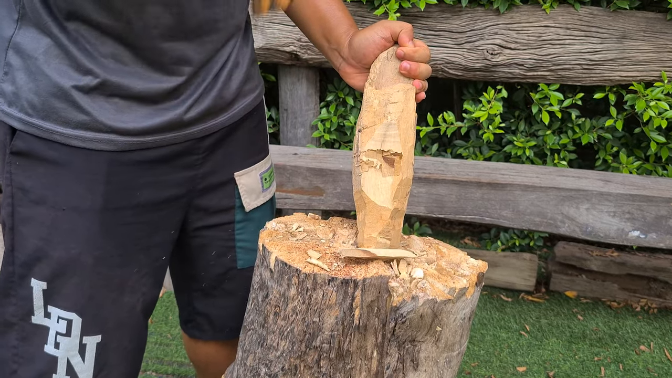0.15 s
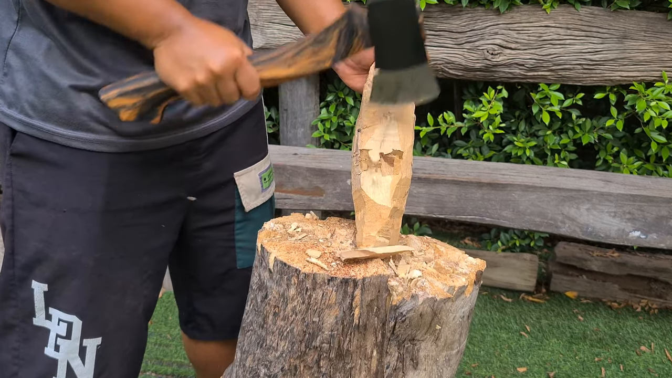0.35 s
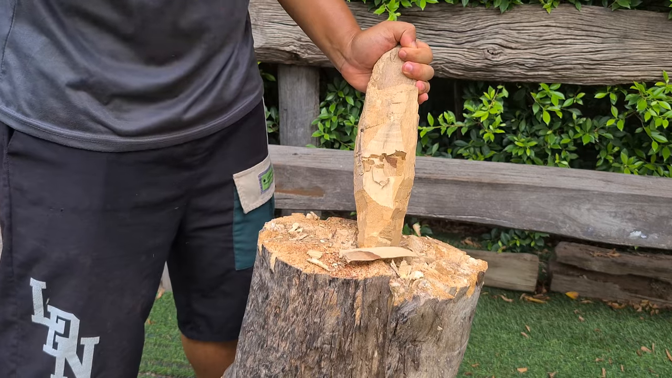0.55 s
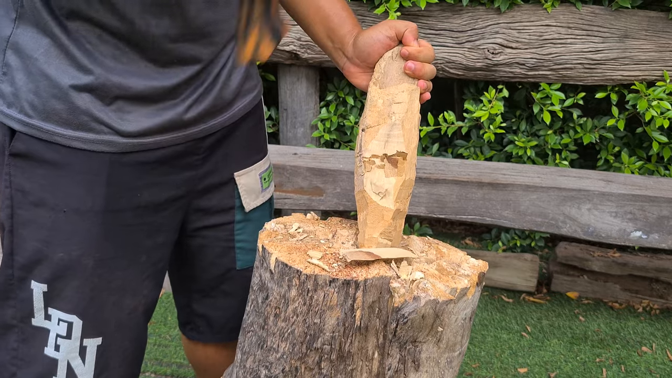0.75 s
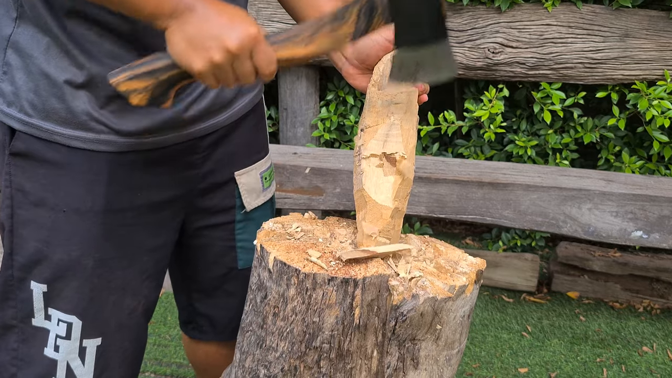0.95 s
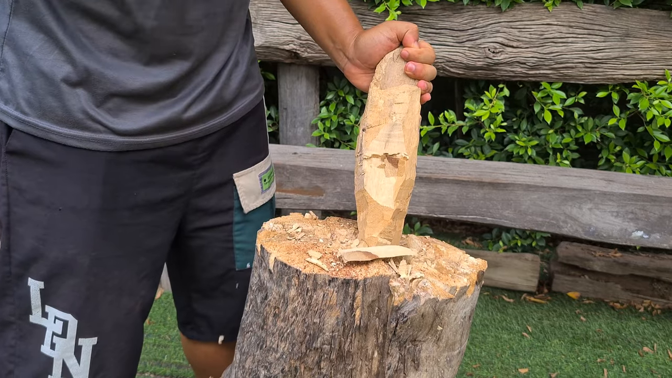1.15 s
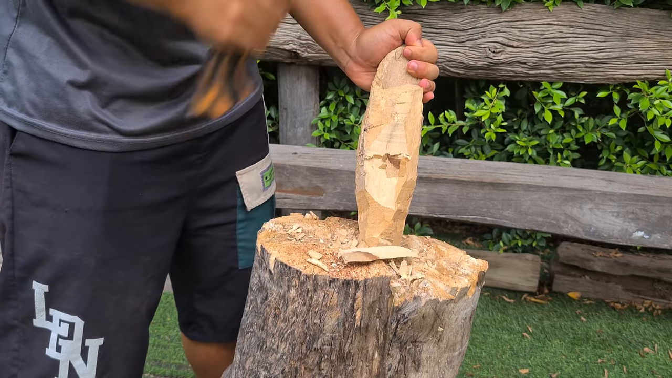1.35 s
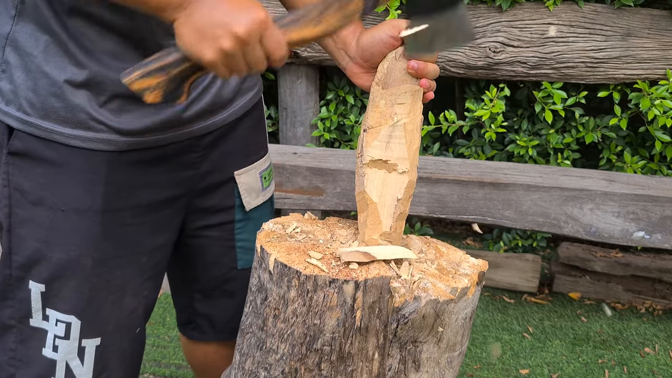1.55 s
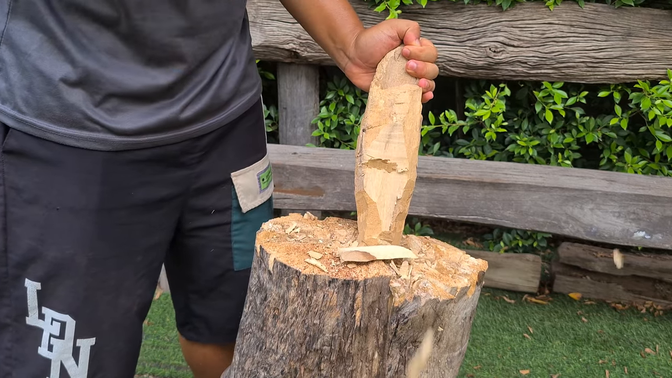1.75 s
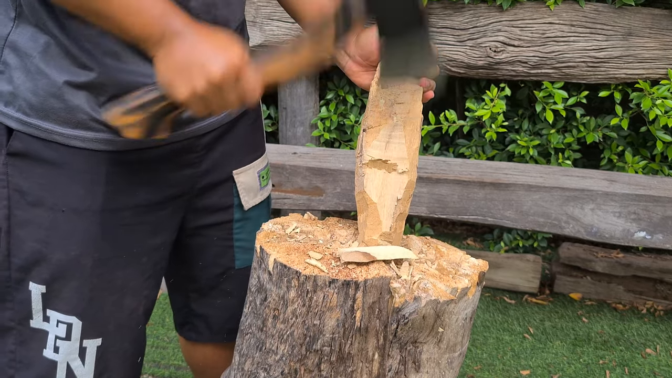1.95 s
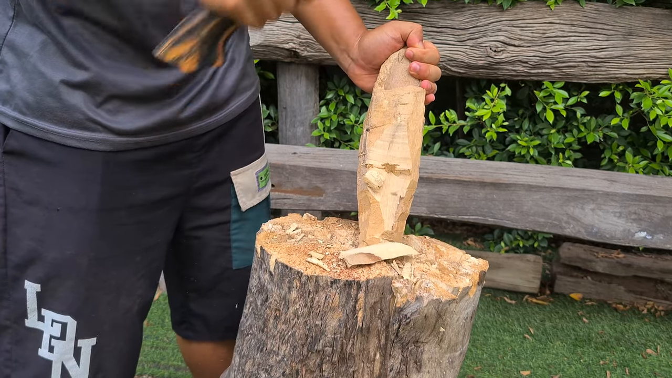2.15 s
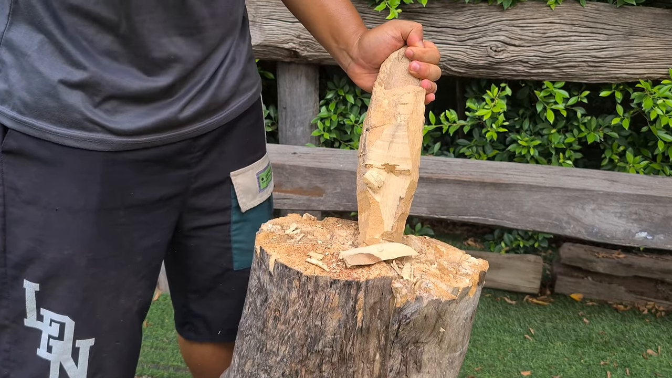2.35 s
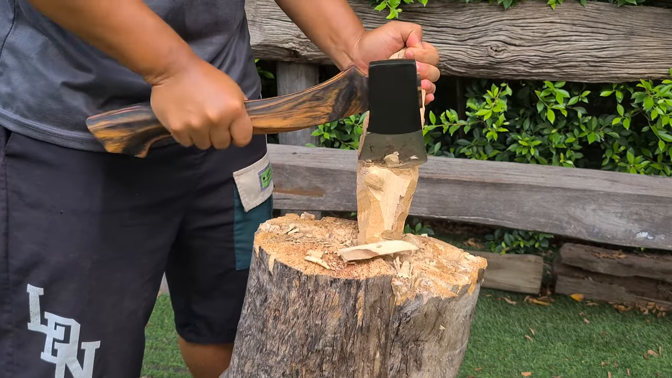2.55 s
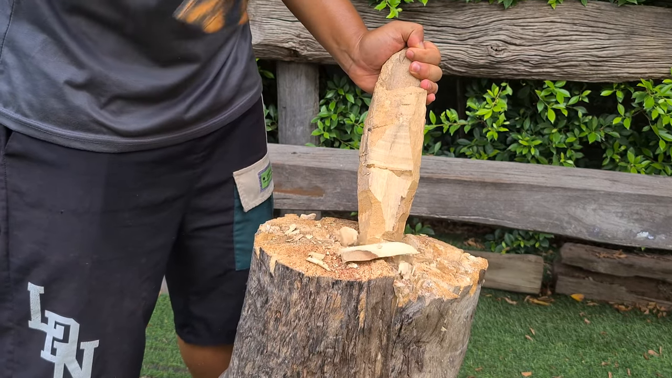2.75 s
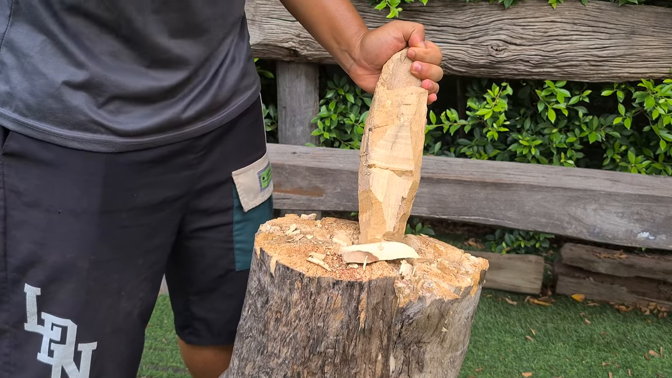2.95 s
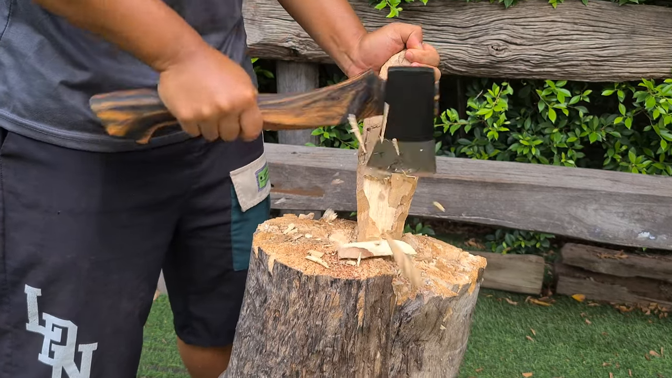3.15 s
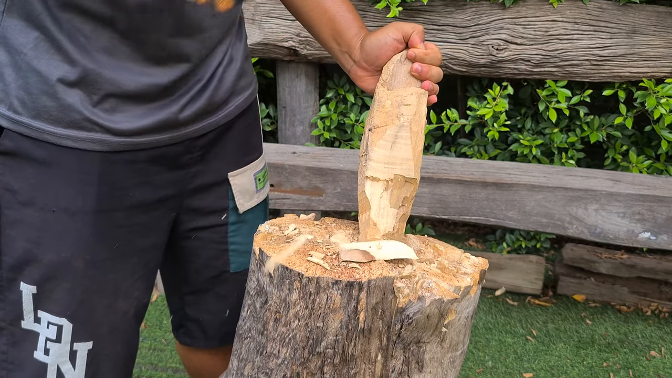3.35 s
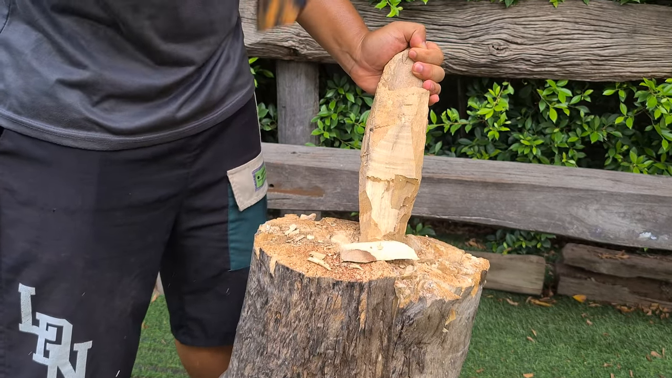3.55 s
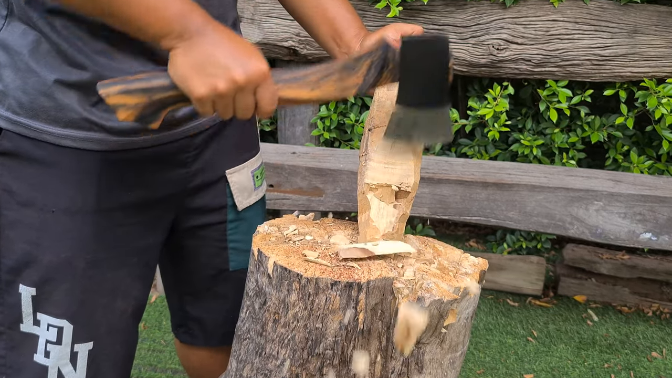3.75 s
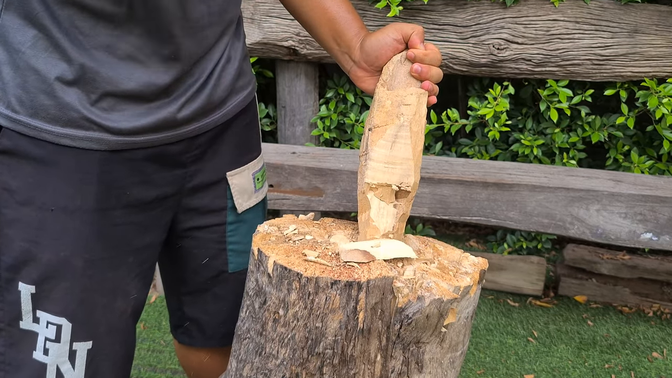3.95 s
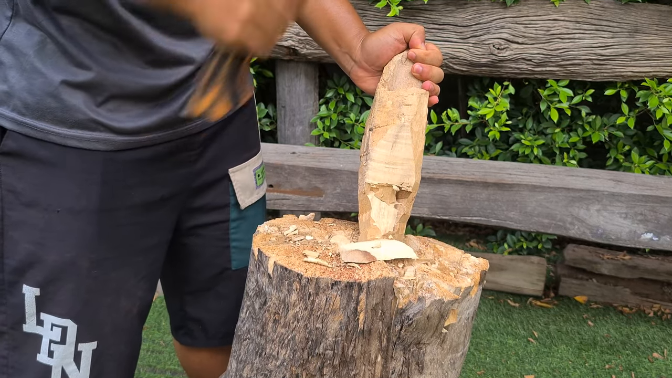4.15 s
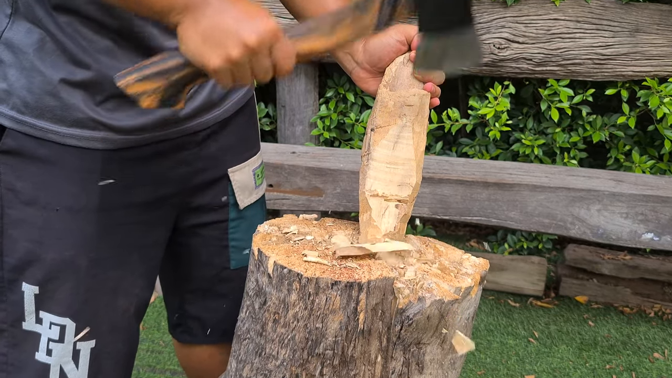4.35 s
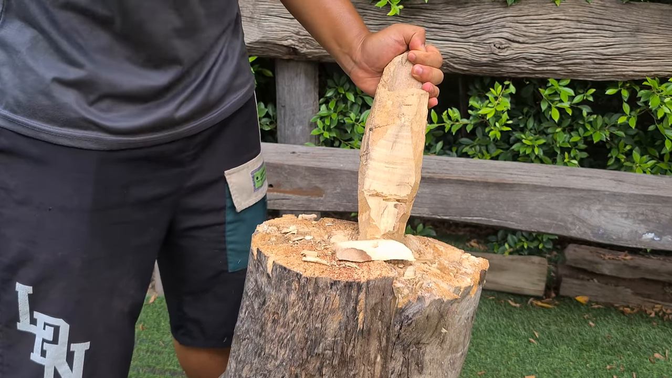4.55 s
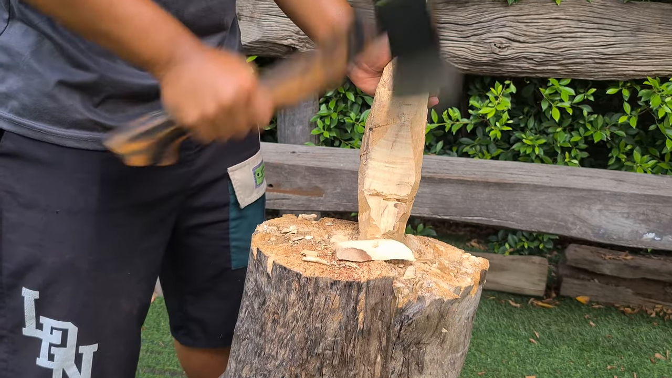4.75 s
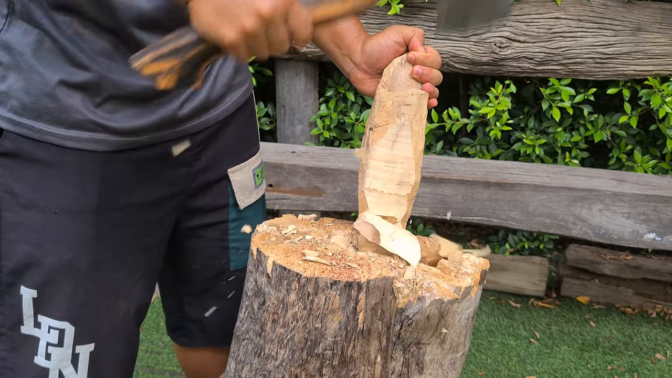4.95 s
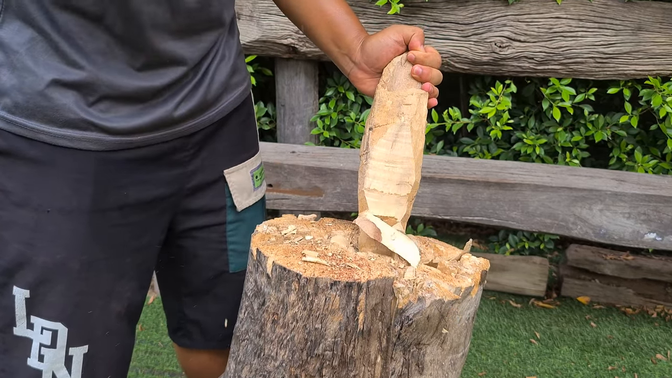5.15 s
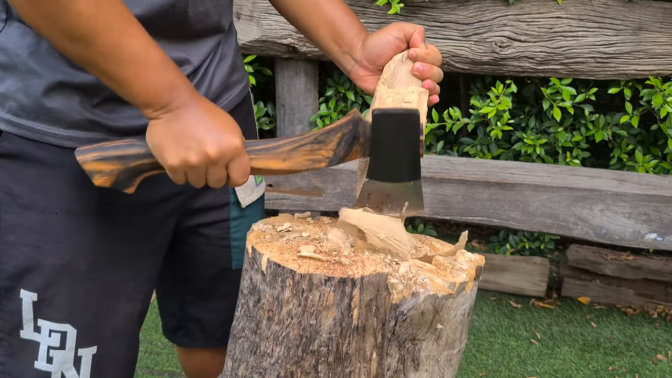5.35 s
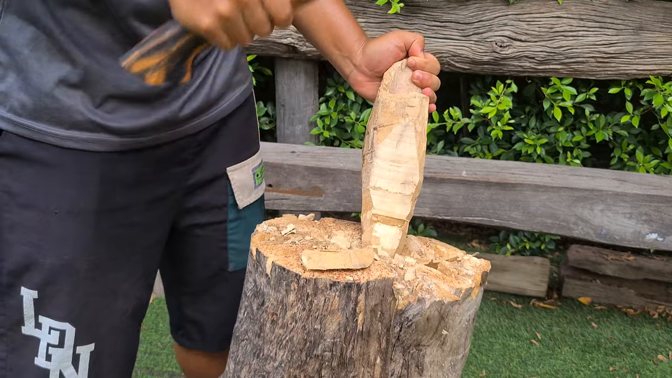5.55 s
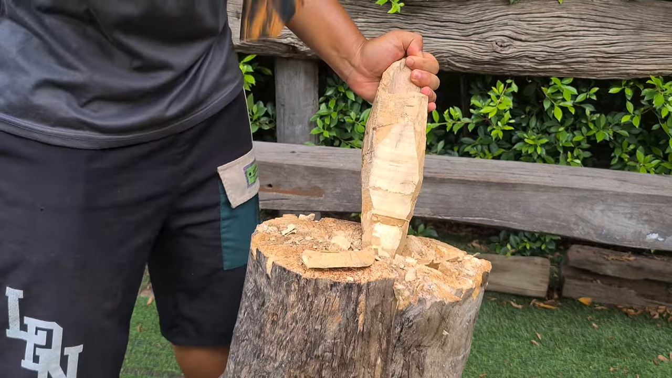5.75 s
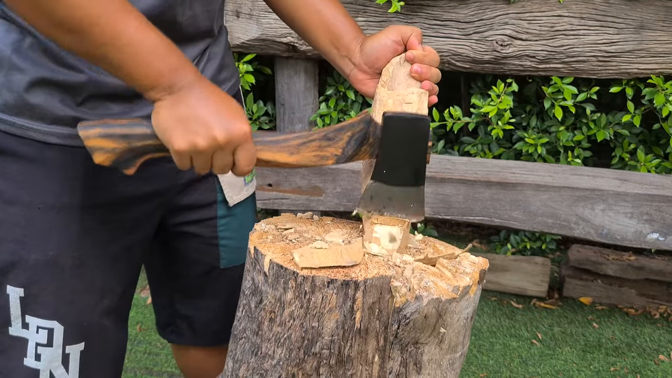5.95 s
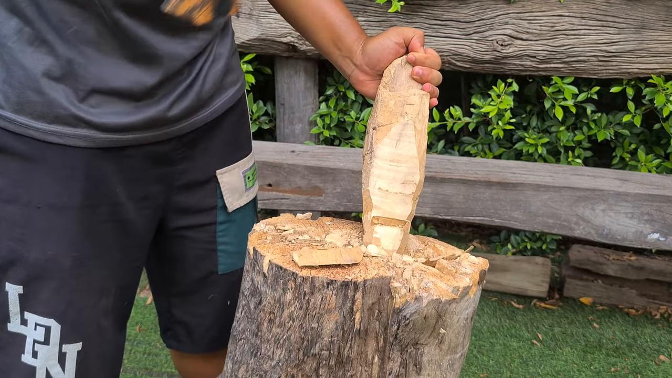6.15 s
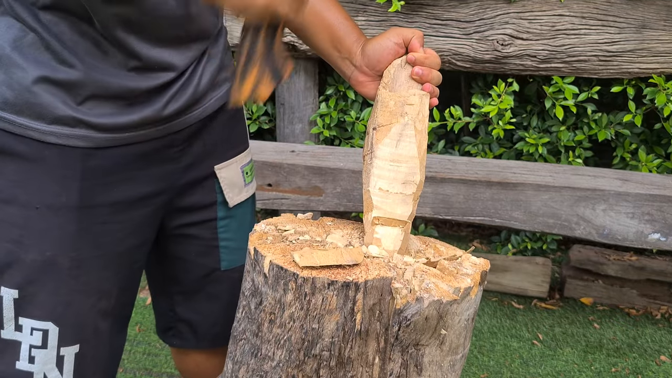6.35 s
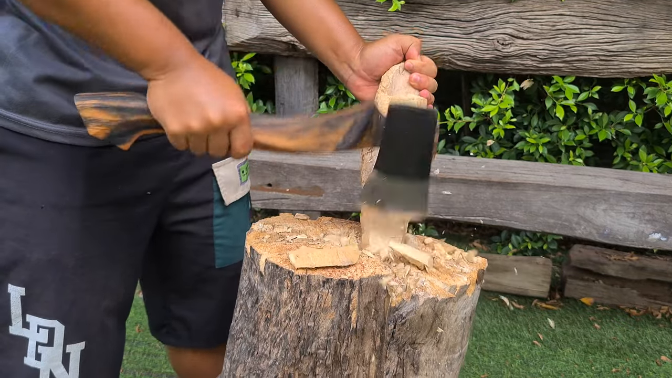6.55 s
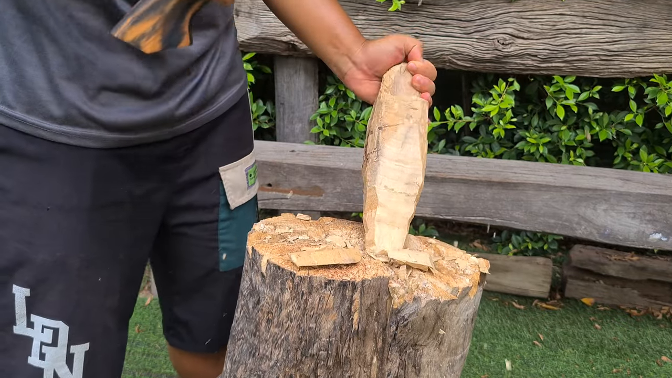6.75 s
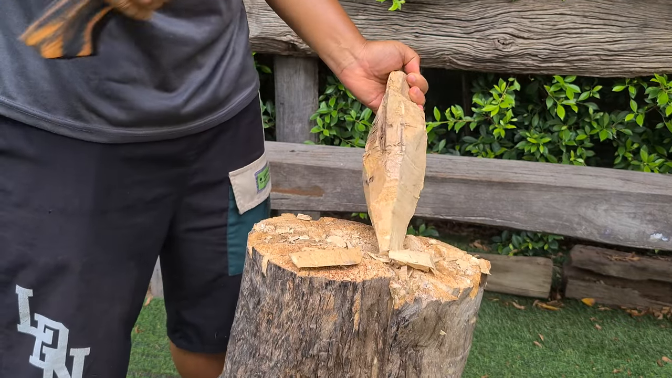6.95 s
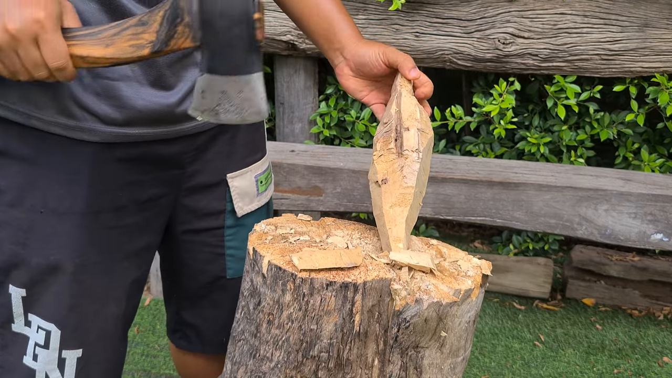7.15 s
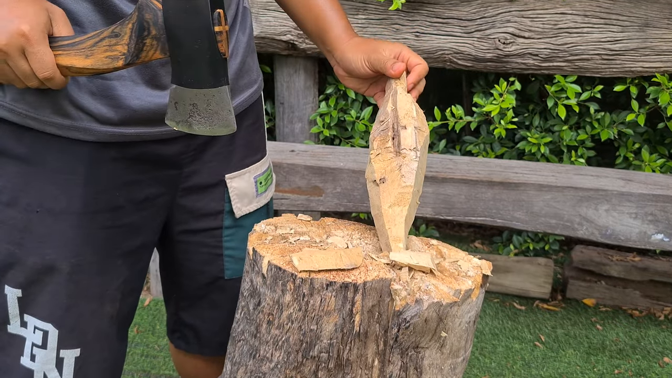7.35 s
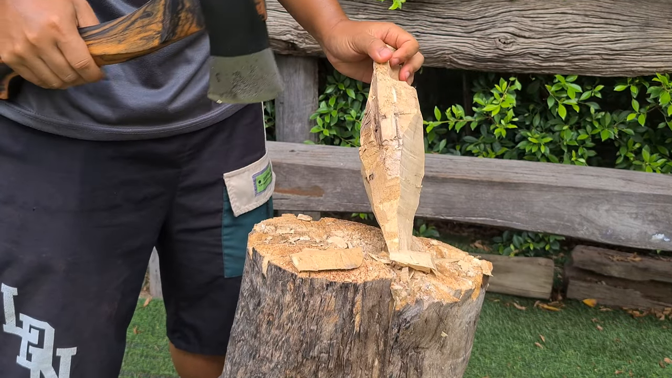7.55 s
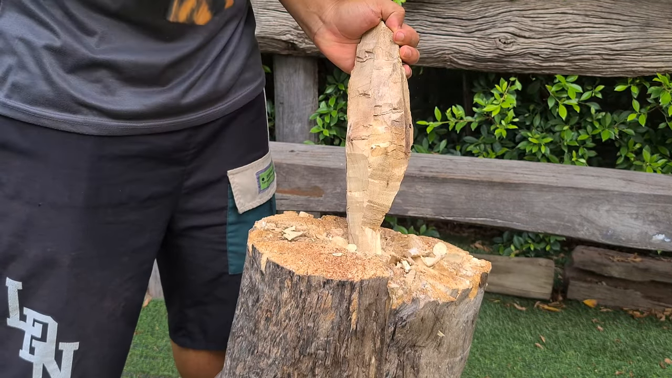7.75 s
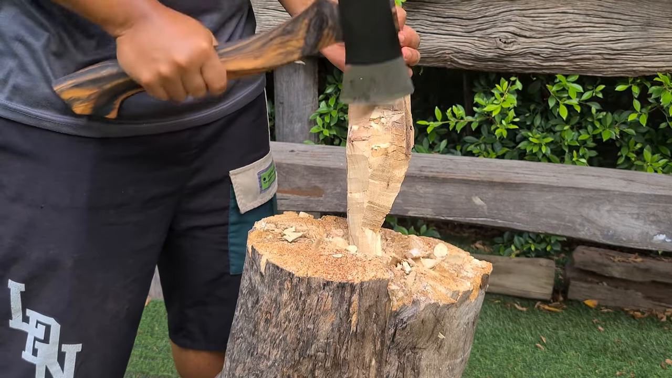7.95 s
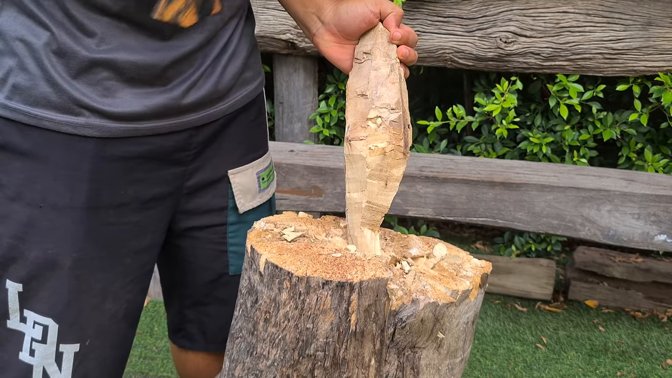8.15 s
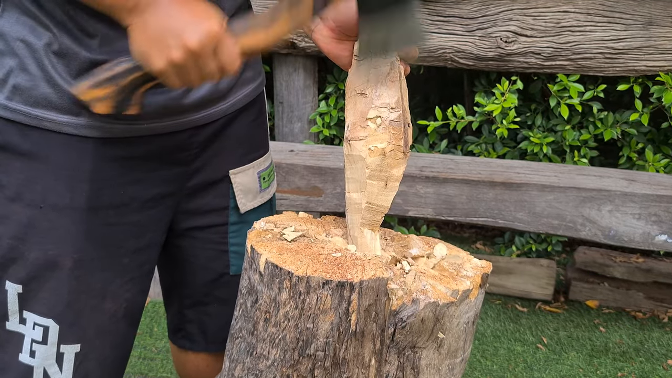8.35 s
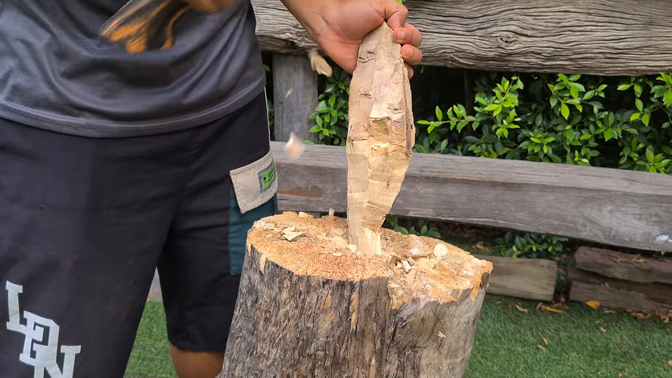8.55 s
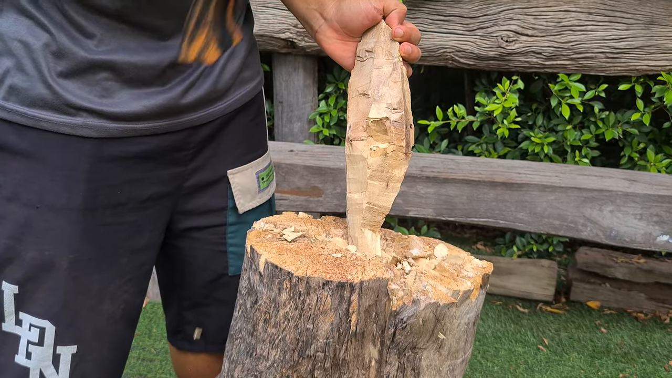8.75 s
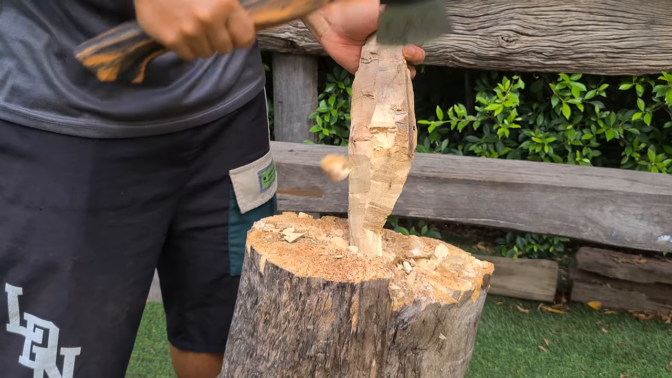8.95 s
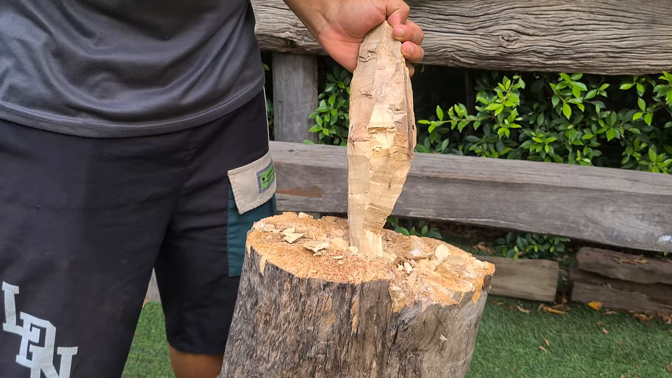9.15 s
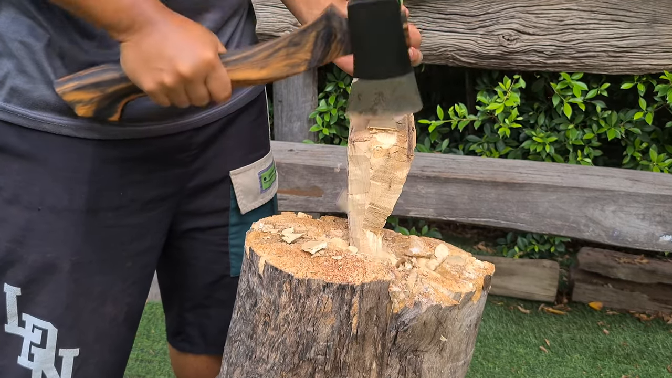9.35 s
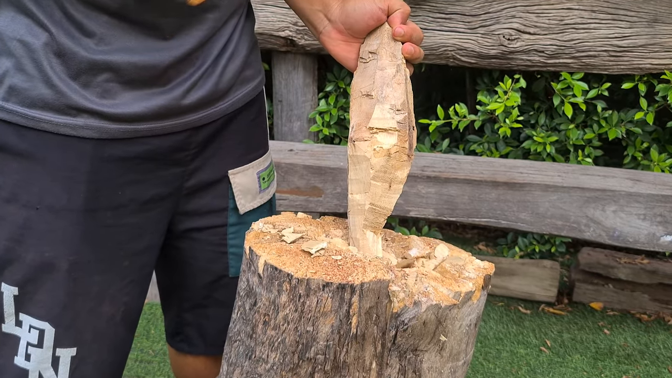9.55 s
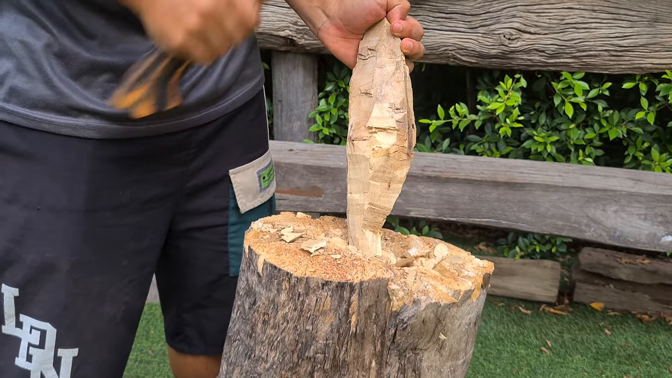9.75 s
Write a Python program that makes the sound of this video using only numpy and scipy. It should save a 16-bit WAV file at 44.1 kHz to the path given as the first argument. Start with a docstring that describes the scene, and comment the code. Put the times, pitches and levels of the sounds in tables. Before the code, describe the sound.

Close to the microphone in a fenced yard, a hatchet strikes a wooden block on a stump about every half second, each blow a sharp clack with tearing fibres, a low thud and a short outdoor echo. Small chips tick and tap down between blows. After a pause with faint hand rubbing, lighter, slightly quicker chops follow over a distant machine's low hum and pulsing hiss.

```python
"""In a fenced yard, a hatchet hews a hand-held billet on a chopping stump, close to the microphone.
Each blow is a mix of ringing wood, tearing noise and a thud from the stump; echoes of the yard follow it.
Chips tap and ping as they land, and the hand rubs the wood. After a cut to a later moment come lighter,
quicker blows, over the pulsing noise hiss, rumble and hum of a distant machine, heard from that cut on.
Behind them lie a faint whining tone, and shaped noise for distant traffic, moving air and leaves."""
import sys
import numpy as np
from scipy import signal
from scipy.fft import rfft, irfft, next_fast_len
from scipy.io import wavfile
from scipy.ndimage import map_coordinates

SR = 44100
rng = np.random.default_rng(int(sys.argv[2]) if len(sys.argv) > 2 else 0)


def dump_mix(stems):
    """Bounce the given channels to the path in sys.argv[1] as a 16-bit WAV at rate SR."""
    frames = np.atleast_2d(stems).T  # one column per channel
    limited = np.clip(frames, -1, 1)  # hard clip at full scale
    pcm = np.round(limited * 32767).astype(np.int16)
    wavfile.write(sys.argv[1], SR, pcm)


N = 436590


def amp(db):
    """Turn decibels into gain."""
    return 10 ** (np.asarray(db) / 20)


def unit(x):
    """Scale to rms 1."""
    return x / np.sqrt(np.mean(x ** 2) + 1e-20)


def burst(x):
    """Scale a short sound to the energy of 10 ms at rms 1."""
    return x / np.sqrt(np.sum(x ** 2) / (SR / 100) + 1e-20)


def along(points, hz):
    """Read a curve of (frequency, value) points, drawn straight on a log frequency axis."""
    point_hz, value = np.transpose(points)
    return np.interp(np.log(hz + 1), np.log(point_hz), value)


def filtered(x, response):
    """Multiply the spectrum of x by a response that depends on frequency."""
    n = x.shape[-1]
    padded = next_fast_len(n + 4096)
    spectrum = rfft(x, padded) * response(np.fft.rfftfreq(padded, 1 / SR))
    return irfft(spectrum, padded)[..., :n]


def coloured(x, points, size=2048):
    """Give x the tone colour of (frequency, level) points, with no sound before its cause."""
    gain = amp(along(points, np.fft.rfftfreq(size, 1 / SR)))
    # folding the cepstrum makes the filter minimum phase
    cepstrum = irfft(np.log(gain))
    cepstrum[1:size // 2] *= 2
    cepstrum[size // 2 + 1:] = 0
    impulse = irfft(np.exp(rfft(cepstrum)))
    return signal.fftconvolve(x, impulse)[:len(x)]


def wobble(rate):
    """Draw a smooth random curve with a number of knots a second."""
    knots = rng.standard_normal(int(N * rate / SR) + 4)
    return map_coordinates(knots, [np.arange(N) * rate / SR])


def add(track, s, x):
    """Mix x into the track at time s."""
    part = track[..., max(round(s * SR), 0):][..., :x.shape[-1]]
    part += x[..., :part.shape[-1]]


def ring(modes, t, stretch, attack, scatter_db, detune):
    """Struck things ring in fading modes from t = 0, each time at new strengths and pitches."""
    t = np.maximum(t, 0)
    out = 0
    for hz, db, t60 in modes:
        sharp, strong = rng.uniform(-1, 1, 2)
        pitch = hz * stretch * (1 + detune * sharp)
        level = amp(db + scatter_db * strong - 60 * t / t60)
        out = out + level * np.sin(2 * np.pi * pitch * t)
    return burst(out * (1 - np.exp(-t / attack)))


def tear(t, bite, spectrum, fade, spiky_db, linger_db):
    """Fibres snap densely while the contact lasts, then die away with a weak lingering tail."""
    snaps = rng.standard_normal(len(t)) * amp(spiky_db * rng.standard_normal(len(t)))
    after = np.maximum(t - bite, 0)
    dying = np.exp(-after / fade) + amp(linger_db - 60 * after / 0.15)
    moving = (1 - np.exp(-t / 0.0016)) * dying
    return burst(coloured(snaps * moving, spectrum))


def spread(pair, alike_hz):
    """Blend two unrelated signals into left and right: alike in the bass, unrelated above alike_hz."""
    def mid_and_side(hz):
        turn = np.arccos(1 / (1 + (hz / alike_hz) ** 2)) / 2
        return np.array([np.cos(turn), np.sin(turn)])

    mid, side = filtered(pair, mid_and_side)
    return np.array([mid + side, mid - side])


def rush(spectrum, alike_hz, band=lambda hz: 1):
    """Make stereo noise of rms 1 with a spectrum, weighted by a band."""
    noise = spread(rng.standard_normal((2, N)), alike_hz)
    return unit(filtered(noise, lambda hz: amp(along(spectrum, hz)) * band(hz)))


# the billet's own notes, at a billet pitch of PITCH_HZ: (frequency [Hz], level [dB], t60 [s])
BILLET_MODES = [(1077, -8, 0.029), (1192, 6, 0.016), (1312, 3, 0.014), (1495, -7.5, 0.014),
                (2116, -12, .012), (3118, -16.5, 0.0088), (4350, -22.5, 0.0094), (7080, -25, 0.0075)]
# the billet rocking on its foot: (frequency [Hz], level [dB], t60 [s])
FOOT_MODES = [(583, -5.5, 0.055), (671, -3, 0.042), (750, -3.5, 0.076)]
# wood crushed under the edge: (frequency [Hz], level [dB])
CRUSH_COLOUR = [(90, -22), (220, 0.5), (500, -1), (1000, -3.5), (1500, -6), (2200, -23.5), (6000, -50.5)]
# the stump's own notes, at a stump pitch of STUMP_HZ: (frequency [Hz], level [dB], t60 [s])
STUMP_MODES = [(128, -15, .05), (221, -5.5, 0.027), (283.3, 2, 0.037), (374.5, -0.5, 0.037),
               (466, -8.5, 0.062)]
# the stump's long note: (frequency [Hz], level [dB], t60 [s])
LONG_NOTE_MODES = [(436, -1, 0.14), (476, -6.5, .08)]
# breaking fibres: (frequency [Hz], level [dB])
SPLIT_COLOUR = [(900, -35), (1720, 2.5), (2350, -4.5), (3250, 0), (3800, -7), (4400, -3.5), (5300, -15.5),
                (9000, -43.5)]
# fine splinters: (frequency [Hz], level [dB])
SPLINTER_COLOUR = [(3000, -39), (5000, 0), (7000, 2), (8800, -8.5), (12000, -6), (15500, -7.5)]
# the steel head, damped by the wood, at a stretch of 1: (frequency [Hz], level [dB], t60 [s])
HEAD_MODES = [(1690, 3.5, 0.043), (3216, -0.5, .14), (4320, -2, 0.096), (6700, -11, .09),
              (8070, -15.5, .09), (11700, -19, .1)]
PITCH_HZ, STUMP_HZ = 1200, 286  # pitches at which the billet and stump notes are listed
# the long note under a thud of 0 dB; dB it gains per dB of thud; its ceiling
RING_DB, RING_GROWS, RING_MAX_DB = -7, 1.4, -28.5


def blow(bite, billet_hz, stump_hz, clack_db, knock_db, thud_db, split_db, splinter_db, head_db):
    """The edge strikes the billet, tears through the grain and drives the billet into the stump."""
    t = np.arange(SR // 6) / SR
    stretch = billet_hz / PITCH_HZ
    # the billet is struck at first contact and again when the blade jams
    strike = ring(BILLET_MODES, t, stretch, attack=0.00093, scatter_db=2.5, detune=.04)
    jam = ring(BILLET_MODES, t - .7 * bite, stretch, attack=0.00025, scatter_db=3.5, detune=0.068)
    x = -amp(clack_db) * burst(strike + 0.32 * jam)
    # the knock: the billet rocks on its foot as the edge crushes into it
    rock = ring(FOOT_MODES, t, stretch, attack=0.0025, scatter_db=5.0, detune=0.074)
    crush = tear(t, bite, CRUSH_COLOUR, fade=0.0044, spiky_db=4.0, linger_db=-21)
    x += amp(knock_db) * (rock + 0.96 * crush)
    # the push reaches the stump as the blade slows
    thud_stretch = stump_hz / STUMP_HZ
    thud = ring(STUMP_MODES, t - .6 * bite, thud_stretch, attack=.0015, scatter_db=2.5, detune=.08)
    x -= amp(thud_db) * thud
    # a harder push wakes the stump's long note more, up to a ceiling
    ring_db = min(RING_DB + RING_GROWS * thud_db, RING_MAX_DB)
    x += amp(ring_db) * ring(LONG_NOTE_MODES, t - bite, 1, attack=0.0069, scatter_db=1, detune=.025)
    # wood is split and splintered while the blade moves
    x += amp(split_db) * tear(t, bite, SPLIT_COLOUR, fade=0.0012, spiky_db=4, linger_db=-26.5)
    x += amp(splinter_db) * tear(t, bite, SPLINTER_COLOUR, fade=0.0011, spiky_db=6, linger_db=-26.5)
    # a glancing cut leaves the head free to ring
    x += amp(head_db) * ring(HEAD_MODES, t, 0.98, attack=0.0011, scatter_db=4.0, detune=0.0074)
    # the blow carries little deep bass
    return signal.sosfilt(signal.butter(2, 80, "high", fs=SR, output="sos"), x)


# the blows: (time [s], bite length [s], billet pitch [Hz], stump pitch [Hz], clack [dB], knock [dB],
# thud [dB], split [dB], splinter [dB], head ring [dB], yard echo relative to the blow [dB])
BLOWS = [(0.2227, 0.0039, 1200, 245, -12, -20.5, -10, -28.5, -28.5, -46, -18),
         (0.7963, .003, 1209, 278.4, -11.5, -19, -15.5, -25.5, -36, -39, -11),
         (1.3646, 0.0051, 1173, 303.6, -13.5, -20.5, -18, -22.5, -24.5, -41, -11.5),
         (1.9324, .003, 1240, 282.2, -13.5, -21.5, -16.5, -33, -36, -44.5, -9),
         (2.488, 0.0033, 1204, 296, -12, -20, -12.5, -27, -37, -46, -10.5),
         (3.048, 0.0047, 1152, 281, -14, -21.5, -23, -18.5, -23.5, -45, -13),
         (3.6172, .0027, 1220, 290, -12.5, -29, -20.5, -25.5, -30.5, -46, -9),
         (4.1697, .0031, 1244, 288.6, -15.5, -26.5, -14.5, -23.5, -21, -48, -14.5),
         (4.7342, 0.0031, 1154, 278, -16, -31.5, -23.5, -20, -29.5, -46, -9.5),
         (5.2799, .0019, 1214, 269.4, -13, -26, -16.5, -23.5, -29, -48, -11.5),
         (5.8403, .005, 1243, 294.5, -14, -20.5, -11, -21.5, -28.5, -36.5, -15.5),
         (6.3881, 0.00354, 1220, 256, -15.5, -31, -24, -21, -29.5, -34, -6.5),
         (7.8588, .007, 1050, 285, -25.5, -21, -19.5, -22.5, -25, -29, -19),
         (8.3233, .0086, 1108, 319, -18, -22, -20, -21, -20.5, -33.5, -14),
         (8.7958, .0024, 1032, 270, -14, -26.5, -21, -24, -27, -35.5, -12.5),
         (9.2663, 0.0059, 1130, 288, -16.5, -23, -17, -25, -26.5, -33, -12),
         (9.7452, 0.0025, 1236, 266, -13, -22.5, -25.5, -21.5, -31.5, -30.5, -8)]


def chops(count=3):
    """Every blow radiates a different blend of its modes in each of a few directions."""
    out = np.zeros((2, N))
    for s, *stroke, echo_db in BLOWS:
        rays = [blow(*stroke) for _ in range(count)]
        add(out, s, in_yard(rays, echo_db))
    return out


# how long the yard's echo lasts: (frequency [Hz], t60 [s])
YARD_T60 = [(150, .33), (450, .42), (1200, 0.4), (3000, 0.37), (7000, .33), (14000, 0.23)]
# the echo's tone colour: (frequency [Hz], level [dB])
YARD_COLOUR = [(100, 4), (250, -2.5), (450, 1.5), (800, -1.5), (1200, -5.5), (3000, 2.5), (5000, -4),
               (8000, -1.5), (15000, -2)]


def yard_tail(x):
    """The hedge, walls and fence answer a short sound with a smeared echo whose fade depends on pitch."""
    hz, t, noise = signal.stft(rng.standard_normal((2, SR // 2)), SR, nperseg=256)
    # the far wall returns a dense cluster of echoes after about 40 ms
    build_up = 1 - np.exp(-t / 0.0015) + 0.53 * np.exp(-((t - .038) / 0.003) ** 2)
    decay = amp(-60 * t / along(YARD_T60, hz)[:, None])
    tail = signal.istft(noise * decay * build_up, SR, nperseg=256)[1]
    tail = spread(tail / np.linalg.norm(tail[0]), alike_hz=800)
    tail = filtered(tail, lambda f: amp(along(YARD_COLOUR, f)))
    return signal.fftconvolve(x[None], tail, axes=1)


# near reflections, before they are dulled: (delay [s], level [dB])
FENCES = [(.0135, -15.5), (.0185, -17), (.034, -23), (.0405, -19), (.046, -21)]
# how far left leads right between the microphone ports: (frequency [Hz], phase [radians])
LEFT_LEAD = [(100, .03), (500, .1), (1200, .3), (2200, .6), (4000, 0.65), (6000, 1.15), (9000, 1.4),
             (14000, 1.3)]


def in_yard(rays, echo_db):
    """The first ray reaches the microphone directly; all rays come back from the yard."""
    out = amp(echo_db) * sum(yard_tail(ray) for ray in rays) / np.sqrt(len(rays))
    for k, (delay, db) in enumerate(FENCES):
        dull = filtered(rays[k % len(rays)], lambda f: 1 / np.sqrt(1 + (f / 800) ** 2))
        for ear in out:
            add(ear, delay + rng.normal(0, 0.00013), amp(db) * dull)

    def lead(f):
        return np.exp(1j * along(LEFT_LEAD, f) * np.array([[.5], [-.5]]))

    add(out, 0, filtered(rays[0], lead))
    return out


# chips landing and the billet being set down:
# (time [s], scrape before the knock [s], knock [dB], click [dB], snap [dB])
TICKS = [(0.481, .001, -61.5, -66.5, -72), (1.832, 0.0016, -41.5, -51, -62.5),
         (2.736, .001, -57.5, -62, -70.5), (3.409, .0055, -36, -49, -48.5),
         (4.005, .001, -49.5, -64.5, -64.5), (4.531, 0.00084, -62, -45.5, -61),
         (4.649, 0.0009, -48, -63.5, -75.5), (4.912, .001, -62.5, -64.5, -53),
         (5.103, 0.00089, -64, -61, -71.5), (5.616, 0.00089, -68, -70, -67.5), (6.729, .001, -76, -67, -70)]
# light wooden contact: (frequency [Hz], level [dB])
TAP_COLOUR = [(100, -15.5), (250, 2.5), (700, 3.5), (1200, -0.5), (1600, -6.5), (4000, -28.5)]
# a flying chip bounces off something hard: (time [s], level [dB])
PINGS = [(4.46, -47.5), (4.545, -50)]
# the ring of that bounce: (frequency [Hz], level [dB], t60 [s])
PING_MODES = [(1280, -5, 0.06), (2484, 0.5, .11), (2583, -1, .09), (3030, 1, 0.035), (6350, -17, 0.16),
              (6850, -11, 0.096), (12400, -20, 0.091)]


def small_sounds():
    """Chips and the billet's foot scrape and tap the stump; one chip rings as it bounces."""
    out = np.zeros((2, N))
    t = np.arange(SR // 4) / SR
    for s, lead, knock_db, click_db, snap_db in TICKS:
        click = tear(t, lead, SPLIT_COLOUR, fade=0.0022, spiky_db=1, linger_db=-23.5)
        snap = tear(t, lead, SPLINTER_COLOUR, fade=0.0013, spiky_db=6.0, linger_db=-26)
        knock = tear(t, .0008, TAP_COLOUR, fade=0.0011, spiky_db=3, linger_db=-28.5)
        tick = amp(click_db) * click + amp(snap_db) * snap
        add(tick, lead, amp(knock_db) * knock)
        add(out, s, in_yard([tick], echo_db=-19.5))
    for s, db in PINGS:
        note = ring(PING_MODES, t, 1, attack=.001, scatter_db=2, detune=.002)
        click = tear(t, 0.003, SPLIT_COLOUR, fade=0.003, spiky_db=3, linger_db=-18)
        scrape = tear(t, 0.0043, SPLINTER_COLOUR, fade=0.0039, spiky_db=3, linger_db=-11)
        bounce = amp(db) * (note + .4 * click + 0.2 * scrape)
        add(out, s, in_yard([bounce], echo_db=-16.0))
    return out


# the hand shifts the billet: (time of the middle [s], half length [s], level [dB])
RUSTLES = [(0.64, 0.013, -73), (6.764, 0.041, -72.5), (7.062, 0.038, -71.5), (7.581, 0.045, -66.5),
           (7.681, 0.024, -67)]
# skin and chips on wood: (frequency [Hz], level [dB])
RUB_COLOUR = [(600, -14), (1700, 4), (3400, 5), (6500, -11), (9000, -20), (16000, -32)]


def handling():
    """The hand rubs, turns and regrips the billet between blows: short swells of rough noise."""
    t = np.arange(N) / SR
    touch = sum(amp(db) * np.exp(-((t - s) / half) ** 2) for s, half, db in RUSTLES)
    roughness = amp(3.1 * wobble(150))
    return touch * roughness * rush(RUB_COLOUR, alike_hz=4000)


# the hiss before its bass is cut: (frequency [Hz], level [dB])
HISS_COLOUR = [(71, -35), (120, -2), (289, -6), (463, -11), (789, 6), (1070, -30), (1190, -10),
               (1720, -16.5), (3050, -8), (4500, -14), (6770, -11.5), (8840, -23), (12000, -21),
               (16000, -30)]
# the machine's rumble: (frequency [Hz], level [dB])
DRONE_COLOUR = [(20, -3), (28, 5), (42, -4), (62, -1.5), (88, 1), (120, -15), (180, -17), (270, -18.5),
                (400, -22.5), (750, -23), (1200, -24), (1800, -24.5), (4000, -38.5), (6000, -57)]
# the hum's notes: (multiple of the turning rate [times], level [dB])
HUM_NOTES = [(2, -46.5), (4, -61.5), (5, -64.5), (6, -71.5), (7, -69), (8, -65), (9, -70), (11, -73)]
LATER_MOMENT_S, SHAFT_HZ = 7.782, 36.85  # time of the cut to a later moment, and turning rate
HISS_DB, HISS_FADE_DB_PER_S = -48, 6  # the hiss when first heard, and how fast it dies down
# swells a second; time of one crest; swing of the hiss either way
SWELL_RATE_HZ, SWELL_PEAK_S, SWELL_DEPTH_DB = 8.92, 8.747, 4


def machine():
    """A distant turning machine hums and rumbles, with an evenly pulsing hiss that slowly dies down."""
    t = np.arange(N) / SR
    heard = np.maximum(t - LATER_MOMENT_S, 0)
    swell_db = SWELL_DEPTH_DB * np.cos(2 * np.pi * SWELL_RATE_HZ * (t - SWELL_PEAK_S))
    level = amp(HISS_DB - HISS_FADE_DB_PER_S * heard + swell_db + 1.9 * wobble(6))
    hiss = level * rush(HISS_COLOUR, alike_hz=1490, band=lambda hz: hz ** 2 / (hz ** 2 + 2200 ** 2))
    drone = amp(-47.5 + 0.82 * wobble(16)) * rush(DRONE_COLOUR, alike_hz=810)
    shaft = 2 * np.pi * SHAFT_HZ * t + 0.1 * wobble(6)
    hum = 0
    for multiple, db in HUM_NOTES:
        note = np.sqrt(2) * np.sin(round(multiple) * shaft + rng.uniform(0, 2 * np.pi))
        hum = hum + amp(db + 0.75 * wobble(7.3)) * note
    # silent before the cut, at full level 3.5 ms after it
    fade_in = np.clip(heard / 0.0035, 0, 1)
    return fade_in * (hiss + drone + hum)


# the whine comes and goes once
WHINE_START_S, WHINE_RISE_S, WHINE_HOLD_S, WHINE_FALL_S = 5.8, .3, 1.12, 0.63
WHINE_HZ, WHINE_SAG_HZ_PER_S, WHINE_DB = 1130, 27, -72  # before pitch and level waver


def whine():
    """A thin far-off tone rises, holds and fades, wavering as its pitch sinks."""
    t = np.arange(N) / SR - WHINE_START_S
    pitch = (WHINE_HZ - WHINE_SAG_HZ_PER_S * t) * (1 + .018 * wobble(60))
    flutter_db = 3.2 * wobble(20)
    corners = np.cumsum([0, WHINE_RISE_S, WHINE_HOLD_S, WHINE_FALL_S])
    shape = np.interp(t, corners, [0, 1, 1, 0])
    tone = np.sqrt(2) * np.sin(2 * np.pi * np.cumsum(pitch) / SR)
    return shape * amp(WHINE_DB + flutter_db) * tone


# distant traffic: (frequency [Hz], level [dB])
RUMBLE_COLOUR = [(12, -43), (20, -12.5), (54, -3.5), (103, 0.5), (116, -5.5), (129, -19.5), (152, -20),
                 (220, -28.5), (290, -57.5), (480, -120)]
# moving air: (frequency [Hz], level [dB])
AIR_COLOUR = [(120, -7), (180, -0.5), (300, -2.5), (440, 0.5), (520, -6), (750, -6.5), (1100, -9.5),
              (1600, -16.5), (2400, -22.5), (3400, -27), (4500, -31), (6800, -35.5), (9000, -43),
              (16000, -51)]
# strength of the leaves in the hedge, before it wavers: (time [s], level [dB])
BREEZE = [(0.0, -74), (2.53, -81.5), (4.82, -71.5), (4.95, -74), (7.53, -70.5), (7.7, -69)]
# the leaves' tone colour: (frequency [Hz], level [dB])
LEAVES_COLOUR = [(900, -14), (1600, -2.5), (3300, 0), (4800, -9.5), (6800, -7), (9000, -23.5), (16000, -39)]
RUMBLE_DB, AIR_DB = -52, -62  # traffic and moving air, before they waver


def outdoors():
    """Distant traffic and moving air waver gently as noise; a light breeze stirs the hedge."""
    s, breeze_db = np.transpose(BREEZE)
    rumble = amp(RUMBLE_DB + 2.4 * wobble(3.6)) * rush(RUMBLE_COLOUR, alike_hz=250)
    air = amp(AIR_DB + 1 * wobble(2.4)) * rush(AIR_COLOUR, alike_hz=700)
    leaves_db = np.interp(np.arange(N) / SR, s, breeze_db) + 1 * wobble(7.8)
    leaves = amp(leaves_db) * rush(LEAVES_COLOUR, alike_hz=700)
    return rumble + air + leaves


def scene():
    """Mix everything in the yard; the bass leans a little to the right, the treble to the left."""
    mix = chops() + small_sounds() + handling() + machine() + whine() + outdoors()

    def lean(hz):
        # (frequency [Hz], left over right [dB]), half to each side
        left_over_right_db = along([(80, -1.3), (1000, -.1), (7000, 0.89)], hz)
        return amp(left_over_right_db * np.array([[.5], [-.5]]))

    return filtered(mix, lean)


TOP_HZ = 15650  # where the recorder's treble starts to fall away


def record(dry):
    """The recorder rounds off loud peaks and keeps almost nothing above its band limit."""
    rounded = dry / (1 + np.abs(dry) ** 4) ** (1 / 4)
    return filtered(rounded, lambda hz: amp(-np.clip((hz - TOP_HZ) / 170, 0, 11) ** 2))


dry = scene()
out = record(dry)
dump_mix(out)
```